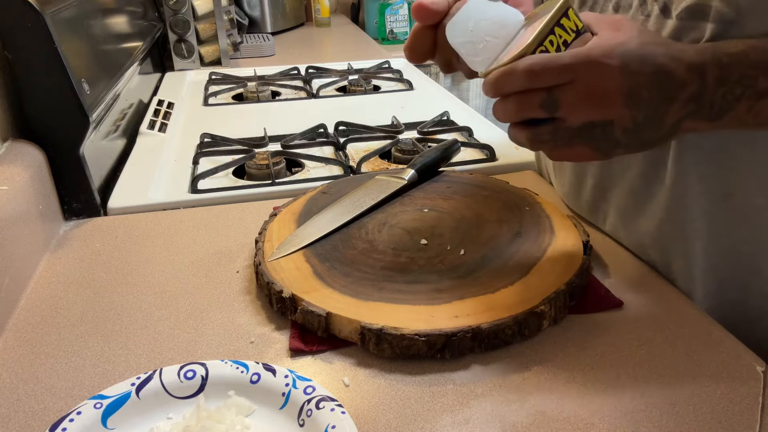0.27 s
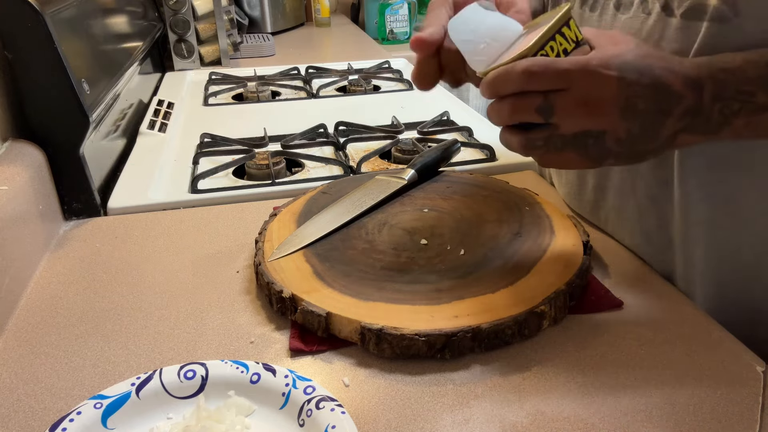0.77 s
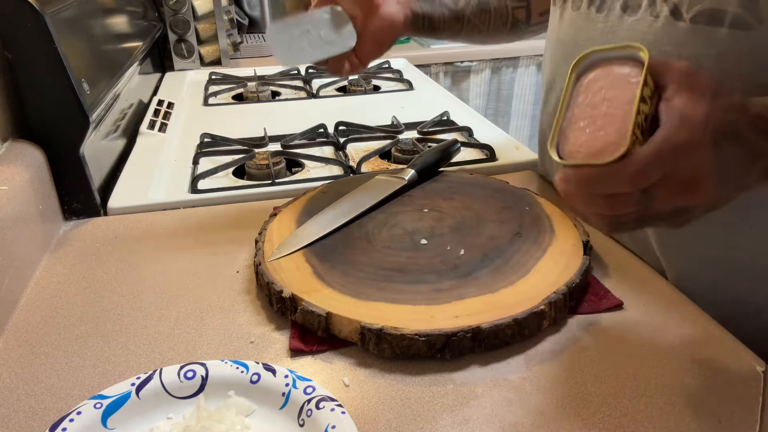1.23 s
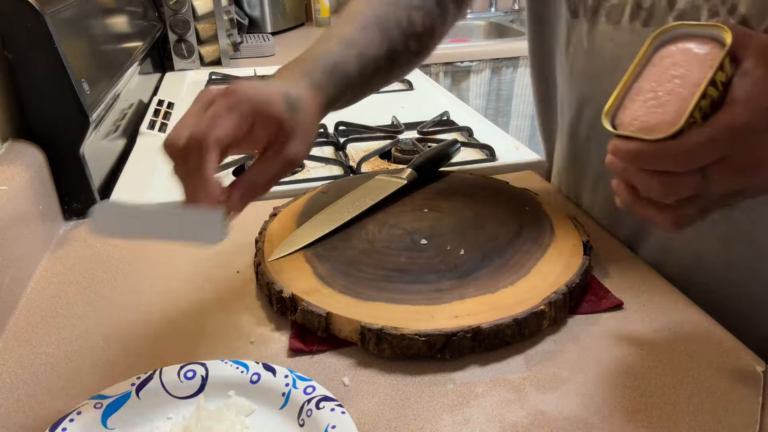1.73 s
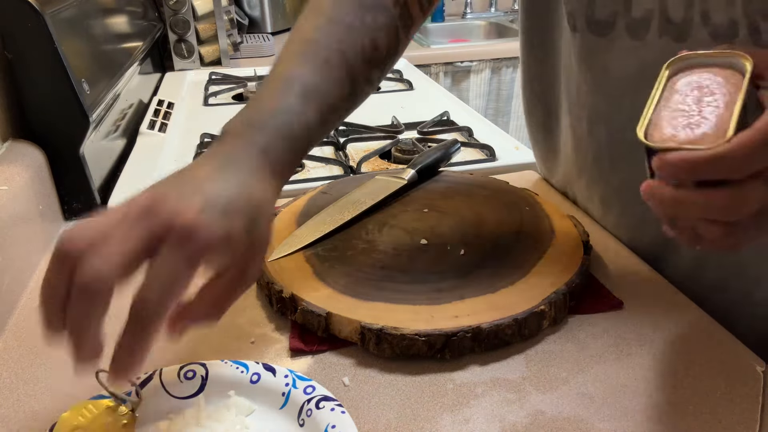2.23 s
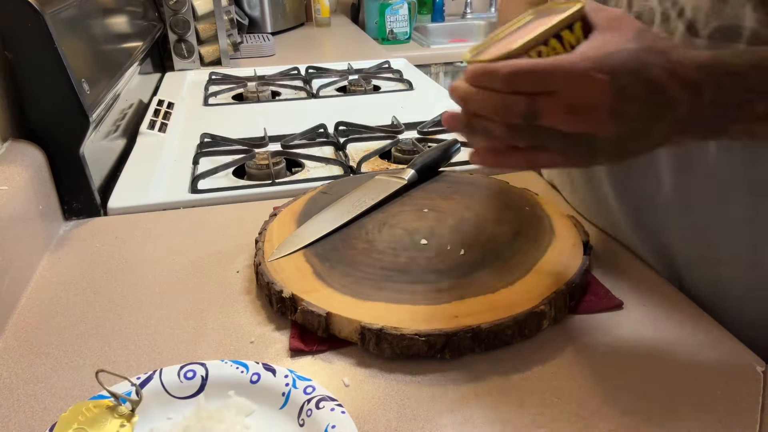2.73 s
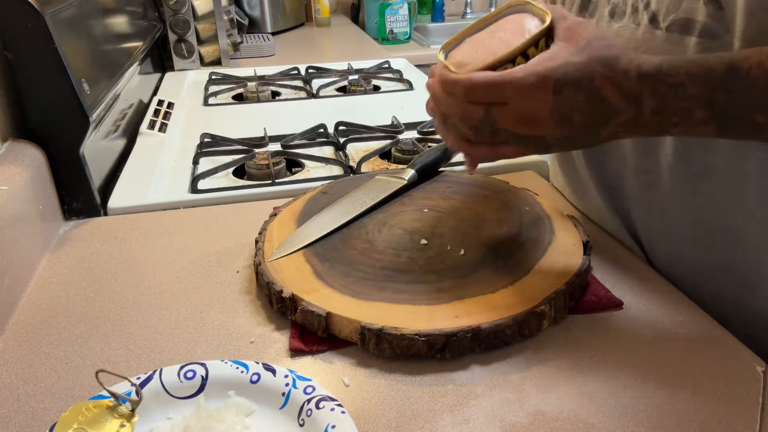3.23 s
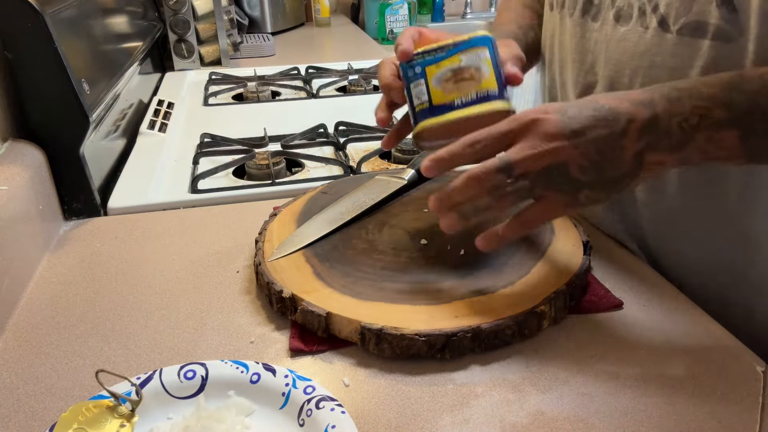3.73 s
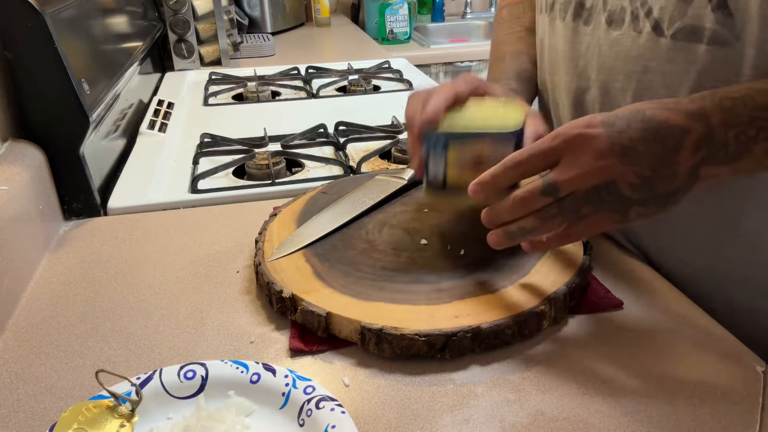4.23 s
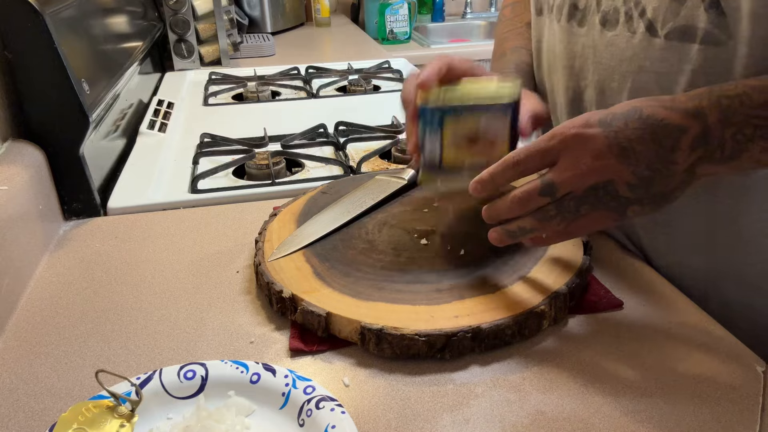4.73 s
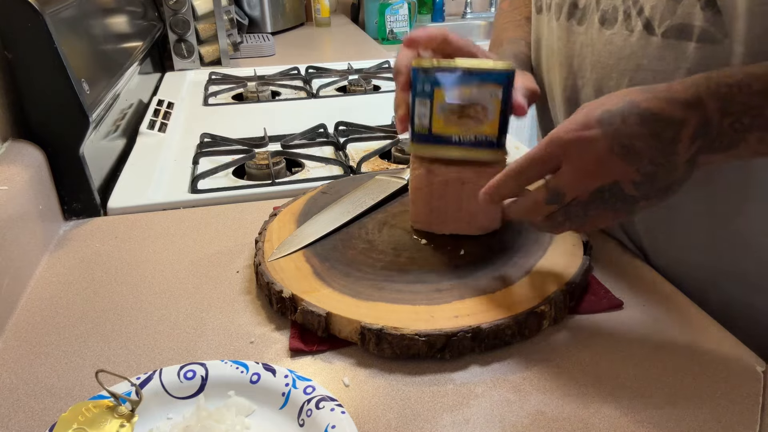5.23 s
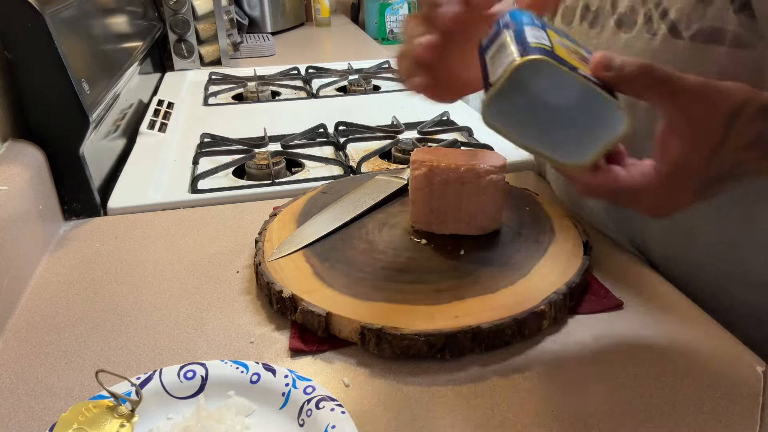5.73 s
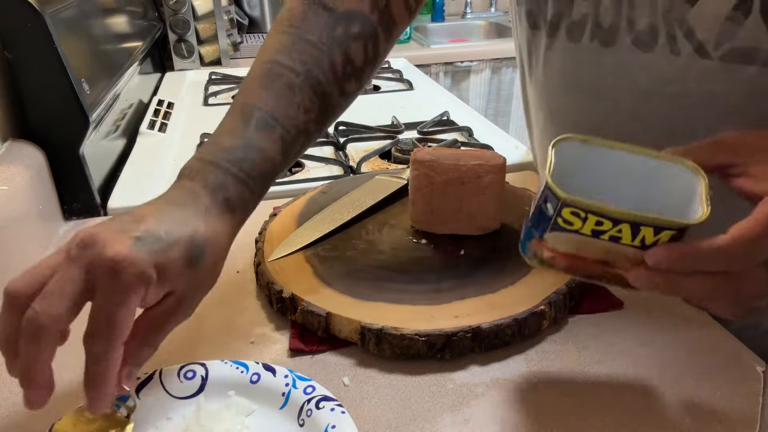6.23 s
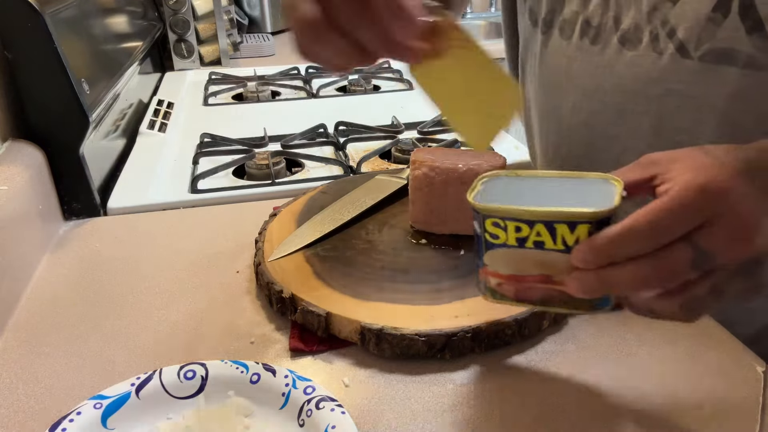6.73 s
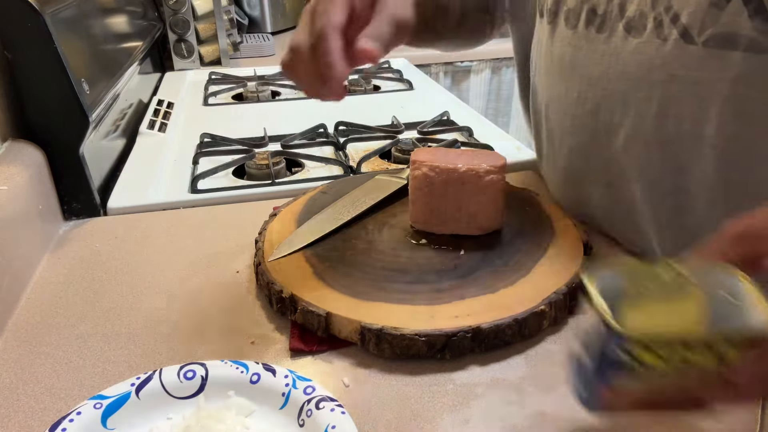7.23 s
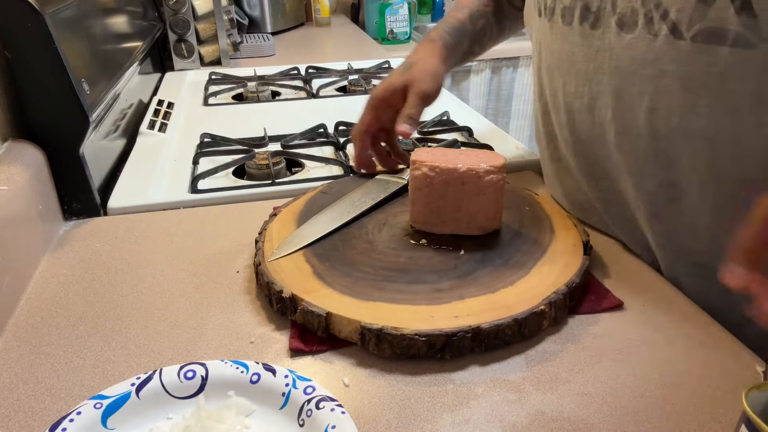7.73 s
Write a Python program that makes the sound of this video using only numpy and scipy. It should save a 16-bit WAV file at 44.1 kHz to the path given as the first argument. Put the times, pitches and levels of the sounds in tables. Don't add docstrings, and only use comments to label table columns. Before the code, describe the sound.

Over a constant low appliance buzz, sharp metal rips and snaps, a wet suck and soft thud, then a lid clanks into an empty can.

```python
import sys
import numpy as np
from scipy import signal
from scipy.fft import rfft, irfft
from scipy.io import wavfile

SR = 44100
rng = np.random.default_rng(int(sys.argv[2]) if len(sys.argv) > 2 else 0)


def unload_wav(signal):
    wavfile.write(
        sys.argv[1],
        SR,
        np.round(np.clip(np.atleast_2d(signal).T, -1, 1) * 32767).astype(np.int16),
    )


def level_to_linear(level):
    exponent = np.asarray(level, float) / 20
    return 10 ** exponent


N = 352610
TIME = np.arange(N) / SR
HZ = np.maximum(np.fft.rfftfreq(N, 1 / SR), 1)

# [f/Hz, level/dB per Hz]
WALL_COLOUR = [(290, -74), (500, -14.5), (819, -8.5), (1360, -13.5), (1600, -2), (1950, -12), (3110, -19),
               (4600, -22.5), (14200, -45), (16000, -96)]


def rms_one(x):
    return x / np.sqrt(np.mean(x ** 2) + 1e-20)


def at_hz(points, hz=HZ):
    table_hz, values = np.transpose(points)
    return np.interp(np.log(hz), np.log(np.maximum(table_hz, 1)), values)


def hump(center_hz, width):
    return np.exp(-(np.log(HZ / center_hz) / width) ** 2)


def drift(rate):
    steps = rng.standard_normal(400)
    return np.interp(TIME * rate % 399, np.arange(400), steps)


def coloured(gain):
    return rms_one(irfft(rfft(rng.standard_normal(N)) * gain, N))


def ring(force, hz, t60):
    radius, angle = level_to_linear(-60 / (t60 * SR)), 2 * np.pi * hz / SR
    push = [0, np.sin(angle) * np.sqrt(1 - radius)]
    return signal.lfilter(push, [1, -2 * radius * np.cos(angle), radius * radius], force + 1e-18)


def contacts(times, levels_db, lengths_ms):
    spike, spike_ms, hard_ms, rise_ms = 2.0, 0.6, 2.0, 0.13
    out = np.zeros(N)
    for s, db, ms in zip(times, levels_db, lengths_ms):
        start = int(s * SR)
        age_ms = np.arange(min(4000, N - start)) / SR * 1000
        rise = 1 - np.exp(-age_ms / rise_ms)
        fade = np.exp(-age_ms / max(ms, 0.3))
        jolt = spike * np.exp(-ms / hard_ms - age_ms / spike_ms)
        out[start:start + len(age_ms)] += level_to_linear(db) * rise * (fade + jolt)
    return out


def blows(table, colour, modes, ring_db, crack_db, grit=0.55):
    s, bright_db, dull_db, ms = np.transpose(table)
    high = 1 / (1 + (3000 / HZ) ** 6)
    shape = level_to_linear(at_hz(colour))
    crack = coloured(shape * high) * contacts(s, bright_db, ms)
    knock = coloured(shape * (1 - high)) * contacts(s, dull_db, ms)
    out = level_to_linear(crack_db) * (crack + knock)
    for hz, db, t60 in modes:
        level_db = bright_db if hz > 2800 else dull_db
        force = grit * rng.standard_normal(N) * contacts(s, level_db, ms)
        force[(s * SR).astype(int) + 12] += 3.4 * level_to_linear(level_db) * rng.choice([-1, 1], len(s))
        out += level_to_linear(db + ring_db) * ring(force, hz, t60)
    return out


def lid_torn():
    # [t/s, bright crack level/dB, dull body level/dB, contact length/ms]
    peel = [
        (.0647, -21, -30.5, 5.3),
        (.0932, -23, -31, 2.3),
        (.1047, -22, -44, 2.3),
    ]
    tear = [
        (.6386, -36, -48, 3),
        (.6669, -27, -28, 4.6),
        (.6815, -12.5, -32, 2.2),
        (.7472, -8, -23.5, 3.4),
        (.7976, -29.5, -40, 3.1),
        (.8616, -25.5, -28.5, 10),
        (.8688, 0.5, -6, 3.5),
        (.8744, -5.5, -17, 8.7),
        (.8876, -7, -10.5, 16),
    ]
    # [f/Hz, level/dB per Hz]
    peel_colour = [(880, -51), (1500, -25), (4040, -17), (4590, 1.5), (5380, -9.5), (12600, 1),
                   (14800, -3.5), (16000, -27.5)]
    tear_colour = [(350, -42), (600, 1.5), (984, -20.5), (2310, -6), (3300, -1.5), (4400, -6), (6550, -5.5),
                   (9620, -1.5), (13600, -8.5), (16000, -26)]
    # [f/Hz, level/dB, t60/s]
    lid_modes = [(2590, -6, .012), (3164, -3, 0.02), (4850, -7, .012), (5920, 1, 0.015), (9800, -6, .009),
                 (12300, -12.5, .005)]
    return (blows(peel, peel_colour, lid_modes, ring_db=-13.5, crack_db=-3.5)
            + blows(tear, tear_colour, lid_modes, ring_db=-8.5, crack_db=-6.0))


def wall_popped():
    # [t/s, bright crack level/dB, dull body level/dB, contact length/ms]
    pop = [
        (2.826, -36, -25.5, 23),
        (2.8425, -34, -33, 1.7),
        (2.8458, -8.5, -1, 2.4),
        (2.8485, -24, -7.5, 0.99),
        (2.8602, -11, -6.5, 14),
        (2.8733, -28.5, -18.5, 39),
    ]
    # [f/Hz, level/dB, t60/s]
    full_can = [(660, -3, 0.057), (1170, -8, 0.024), (1520, -8, 0.022), (1647, -6.5, 0.27),
                (3120, 0, 0.013), (4540, -3, .012)]
    return blows(pop, WALL_COLOUR, full_can, ring_db=-3.5, crack_db=-5.0)


def meat_sucked_loose():
    # [t/s, bright crack level/dB, dull body level/dB, contact length/ms]
    suck = [
        (4.823, -49, -46, 38),
        (4.9142, -30.5, -25.5, 7.1),
        (4.9362, -44, -47, 4),
        (4.9676, -23, -25.5, 5.3),
    ]
    slurp = [
        (4.8545, -24, -19.5, 8.2),
    ]
    # [f/Hz, level/dB per Hz]
    wet_colour = [(410, -18), (700, 7), (767, -21), (1150, -1.5), (2100, -8), (3160, -8), (5540, -6.5),
                  (9990, -7.5), (16000, -24)]
    # [f/Hz, level/dB, t60/s]
    air_gap = [(1120, 6, 0.016), (1300, 6.5, .028)]
    return (blows(suck, wet_colour, [], ring_db=0, crack_db=-2.0)
            + blows(slurp, wet_colour, air_gap, ring_db=-6.5, crack_db=-10.0))


def lid_laid():
    # [t/s, bright crack level/dB, dull body level/dB, contact length/ms]
    lay = [
        (2.107, -23, -32.5, 11),
        (2.1185, -50, -17, 4.9),
        (2.1235, -17, -24.5, 2.2),
        (2.1305, -41, -54, 2.7),
    ]
    # [f/Hz, level/dB per Hz]
    lay_colour = [(410, -53), (700, -9), (1080, -5.5), (1230, -27), (1970, 5.5), (3690, -30.5),
                  (13100, -45.5), (16000, -71)]
    # [f/Hz, level/dB, t60/s]
    laid_lid = [(990, -18.5, .02), (1660, -7, 0.032), (1970, -8, 0.02), (2250, -11, 0.04)]
    return blows(lay, lay_colour, laid_lid, ring_db=-3.5, crack_db=-2.5)


def wall_flexed():
    # [t/s, bright crack level/dB, dull body level/dB, contact length/ms]
    flex = [
        (3.4154, -41, -39, 12),
        (3.418, -40, -20.5, 4.1),
        (3.4294, -39.5, -27, 1.3),
    ]
    # [f/Hz, level/dB, t60/s]
    can_wall = [(427, 12.5, 0.041), (636, 8.5, 0.051), (870, -25.5, .02), (1196, -0.5, 0.061)]
    return blows(flex, WALL_COLOUR, can_wall, ring_db=4.0, crack_db=-24.0)


def lid_dropped():
    # [t/s, bright crack level/dB, dull body level/dB, contact length/ms]
    drop_in = [
        (6.9865, -32, -29, 4.2),
        (6.9912, -12, -7.5, 2.6),
        (7.0466, -17, -12, 7.7),
        (7.0614, -39, -24, 22),
    ]
    # [f/Hz, level/dB per Hz]
    tin_colour = [(290, -72), (500, -54), (773, -3.5), (855, -23), (988, -20), (1950, -32), (2690, -18.5),
                  (6140, -29), (10400, -30), (16000, -42)]
    # [f/Hz, level/dB, t60/s]
    empty_can = [(773, 11, 0.19), (925, 3.5, .09), (981, 6, .07), (1318, -15, 0.37), (1542, -7, 0.049),
                 (2680, -8.5, 0.16), (2940, -4.5, 0.045), (3770, -5, 0.067), (4326, -12, 0.098),
                 (5130, -4.5, 0.043)]
    return blows(drop_in, tin_colour, empty_can, ring_db=8.0, crack_db=-3.0, grit=0.18)


def can_set_down():
    # [t/s, bright crack level/dB, dull body level/dB, contact length/ms]
    set_down = [
        (7.4524, -35.5, -21.5, 19),
        (7.4807, -22.5, -13.5, 6.6),
        (7.4954, -23.5, -21, 18),
        (7.5116, -30, -16, 6),
        (7.5253, -52, -24.5, 13),
    ]
    # [f/Hz, level/dB per Hz]
    rattle_colour = [(290, -66), (500, -3), (1000, -14), (1480, -41), (1620, -21), (3860, -13.5),
                     (6510, -24), (10100, -25.5), (12900, -39), (16000, -96)]
    # [f/Hz, level/dB, t60/s]
    lidded_can = [(779, -12.5, 0.035), (828, -5, 0.047), (921, 4, 0.037), (973, -0.5, 0.056), (962, 7, .04),
                  (1452, -9.5, 0.023), (1170, -7.5, 0.012), (2980, 1, 0.038), (3800, -4, 0.05),
                  (3950, -1, .03), (4770, -7.5, .025), (5490, -3.5, 0.018)]
    return blows(set_down, rattle_colour, lidded_can, ring_db=7.5, crack_db=-5.5, grit=0.44)


def thud():
    # t/s, f/Hz, level/dB, t60/s
    landing = (5.203, 64, -27.5, .2)
    s, hz, db, t60 = landing
    age = np.maximum(TIME - s, 0)
    return level_to_linear(db - 60 * age / t60) * np.sin(2 * np.pi * hz * age)


def ticks():
    # [t/s, thin top level/dB, fuller level/dB]
    bursts = [(0.4414, -57.5, -58), (1.2019, -56, -53), (1.2564, -61, -59.5), (1.6611, -45.5, -42),
              (1.6794, -52, -51), (1.8069, -48, -46.5), (3.2096, -57, -57.5), (3.3021, -45.5, -45),
              (3.36, -35, -48.5), (3.6152, -60, -61), (4.1124, -57, -57.5), (4.565, -55, -53),
              (4.6871, -54, -49), (5.1063, -47, -57), (5.1698, -46, -56), (5.2026, -50, -48.5),
              (5.39, -56, -64), (5.541, -59, -56.5), (6.1694, -57, -60), (6.7134, -50, -48),
              (7.7308, -57, -54), (7.864, -62, -55)]
    s, top_db, full_db = np.transpose(bursts)
    ms = np.full(len(s), 5.4)
    top = coloured(hump(11500, 0.22)) * contacts(s, top_db, ms)
    full = coloured(hump(7000, 0.4)) * contacts(s, full_db, ms)
    return level_to_linear(-6.0) * top + level_to_linear(-3.0) * full


def rustle():
    # [peak t/s, level/dB, fade/dB per s]
    slides = [(0.0, -88, 78), (.44, -79, 27.5), (0.819, -58, 150.5), (1.02, -68, 112), (1.711, -74, 45.5),
              (4.0, -78.5, 22.5), (5.19, -92, 37), (5.8, -72, 25), (6.4, -76.5, 23.5), (7.8, -67.5, 27.5)]
    top_s = 0.061
    airy = hump(10500, 0.22)
    cloth = level_to_linear(-7.5) * hump(4500, 0.71)
    grain = coloured(airy + cloth) * level_to_linear(2.3 * drift(53))
    strokes = np.zeros(N)
    for s, db, fade in slides:
        beyond_top = np.maximum(abs(TIME - s) - top_s * 30 / fade, 0)
        strokes += level_to_linear(db - fade * beyond_top)
    return strokes * grain


def at_both_ports(source):
    # [f/Hz, left lead/rad]
    ports = [(0, 1.5), (600, 2.5), (800, 2.5), (1000, 1.98), (1500, 1.54), (5000, 1.6), (8500, 1.7),
             (10000, -2), (11500, -1.4), (14000, -2)]
    turn = np.exp(0.5j * np.interp(HZ, *np.transpose(ports)))
    return irfft(rfft(source) * np.array([turn, 1 / turn]), N)


def kitchen(far, near):
    # [f/Hz, t60/s]
    decay = [(500, 0.17), (2000, 0.32), (6000, .28), (14000, 0.192)]
    gap_ms, counter_ms = 1.6, 1.5
    age = np.arange(SR // 2) / SR
    edges_hz = [300, 1000, 2500, 5500, 10000, 14000]
    tail = 0
    for low, high in zip(edges_hz[:-1], edges_hz[1:]):
        band_pass = signal.butter(2, [low, high], "band", fs=SR, output="sos")
        band = signal.sosfilt(band_pass, rng.standard_normal((2, len(age))))
        tail = tail + band * level_to_linear(-60 * age / at_hz(decay, np.sqrt(low * high)))
    walls = tail * np.clip(age * 1000 / gap_ms, 0, 1) ** 3
    counter = tail * np.exp(-age * 1000 / counter_ms)
    source = far + level_to_linear(-7.5) * near
    out = np.zeros((2, N))
    for db, echo in [(-6, walls), (-9, counter)]:
        echo = echo / np.sqrt(np.sum(echo ** 2) / 2)
        out += level_to_linear(db) * signal.fftconvolve(source[None], echo)[:, :N]
    return out


def tones(base_hz, table, wobble_db):
    out = np.zeros((2, N))
    for k, left_db, right_db, lead in table:
        phase = 2 * np.pi * (round(k) * base_hz * TIME + rng.random())
        swell = np.sqrt(2) * level_to_linear(wobble_db * drift(2.5))
        out += swell * np.array([level_to_linear(left_db) * np.sin(phase + lead), level_to_linear(right_db) * np.sin(phase)])
    return out


def diffuse(gain, patchy_db):
    # [f/Hz, correlation from -1 to 1]
    likeness = [(60, 0.83), (99, 1), (160, 0.96), (270, 1), (450, -0.15), (740, -0.85), (1220, -0.4),
                (2010, -0.66), (3330, 0.29), (5500, -0.2), (8800, 0.04), (10000, 0.49), (12000, 0.85),
                (13500, 0.35)]
    # [f/Hz, left over right/dB]
    balance = [(60, 6), (110, 0.5), (200, 1.5), (380, -6), (700, 0), (1290, 3), (2380, -3.5), (4400, 2),
               (8120, -1.5), (15000, 3)]
    alike = np.clip(at_hz(likeness), -0.99, 0.99)
    lean = level_to_linear(at_hz(balance) / 2)
    mid, side = rfft(rng.standard_normal((2, N)))
    mid, side = mid * np.sqrt(1 + alike), side * np.sqrt(1 - alike)
    pair = irfft(gain * np.array([lean * (mid + side), (mid - side) / lean]), N)
    return level_to_linear(patchy_db * drift(8.4)) * pair / np.sqrt(np.mean(pair.mean(axis=0) ** 2))


def mains_swell(mains_hz):
    top_db, dip_db, dip_s, period_s = -47, -65, 3.87, 7.2
    swell = np.sin(np.pi * (TIME - dip_s) / period_s) ** 2
    level = np.sqrt(2) * (level_to_linear(dip_db) + level_to_linear(top_db) * swell)
    return level * np.sin(2 * np.pi * mains_hz * TIME) * level_to_linear(np.array([[1.1], [-1.1]]))


def oven():
    # [multiple, left level/dB, right level/dB, left lead/rad]
    transformer = [(2, -25, -27, 0.2), (3, -50, -48, 0.3), (4, -46, -44, 1.3), (5, -56, -57, 0.7),
                   (6, -52, -47, 2.5), (8, -54, -55, 3.0), (10, -53, -59, -2.1)]
    fan = [(1, -58, -59, 0.1), (2, -53, -55, 0.2), (3, -46, -49, 0.1), (4, -40, -39, 0.2),
           (5, -55, -59, 1.0), (6, -61, -65, 0.4), (12, -59, -56, 3.1)]
    # [f/Hz, level/dB per Hz]
    rumble = [(20, -56), (34, -46), (46, -15.5), (64, -15), (88, -15.5), (121, -3.5), (142, -6.5),
              (170, -8), (217, -18.5), (284, -18.5), (383, -13), (410, -16.5), (470, -36.5), (700, -66.5)]
    hiss = [(380, -28), (490, -11.5), (570, -5), (795, -6), (1460, -10.5), (1840, -9), (2460, -11),
            (3600, -19), (6700, -30.5), (10700, -36), (12200, -63), (16000, -87)]
    # [f/Hz, width/Hz, level/dB]
    vent = [(606, 32, 1.5), (708, 43, 6), (912, 12, 5.5), (1024, 10, -0.5), (1705, 32, 3.5),
            (2098, 23, 3.5), (2440, 110, -11.5)]
    mains_hz, fan_hz = 59.97, 44.105
    duct = sum(level_to_linear(db) / (1 + (2 * (HZ - hz) / width) ** 2) for hz, width, db in vent)
    drone = level_to_linear(-37) * diffuse(level_to_linear(at_hz(rumble)), patchy_db=0.85)
    air = level_to_linear(-49.5) * diffuse(level_to_linear(at_hz(hiss)) * (1 + 1.25 * duct), patchy_db=0.3)
    buzz = tones(mains_hz, transformer, wobble_db=0.2)
    whirr = tones(fan_hz, fan, wobble_db=1.5)
    return buzz + whirr + mains_swell(mains_hz) + drone + air


def scene():
    far = lid_torn() + wall_popped() + meat_sucked_loose() + ticks()
    near = lid_laid() + wall_flexed() + lid_dropped() + can_set_down()
    direct = at_both_ports(far + near + rustle())
    return direct + thud() + kitchen(far, near) + oven()


def ducking_db():
    # [t/s, depth/dB]
    ducks = [
        (0.866, -11),
        (2.844, -12.5),
    ]
    # [t/s, gain/dB]
    levelling = [(0, 2.5), (2.8, 1.5), (3.2, -0.16), (6.5, -0.26), (8, 1)]
    attack_s, hold_s, release_s, ease = 0.021, 0.12, 0.09, 0.13
    corners = np.cumsum([0, attack_s, hold_s, release_s])
    gain_db = np.interp(TIME, *np.transpose(levelling))
    for s, db in ducks:
        gain_db = gain_db + db * np.interp(TIME - s, corners, [0, 1, 1 - ease, 0])
    return gain_db


def roll_off(x):
    return signal.sosfilt(signal.butter(12, 16450, fs=SR, output="sos"), x)


def record(dry):
    levelled = dry * level_to_linear(ducking_db())
    rounded = 0.91 * np.tanh(levelled / 0.86)
    low_pass = signal.butter(8, 15900, fs=SR, output="sos")
    return roll_off(signal.sosfilt(low_pass, rounded))


dry = scene()
out = record(dry)
unload_wav(out)
```